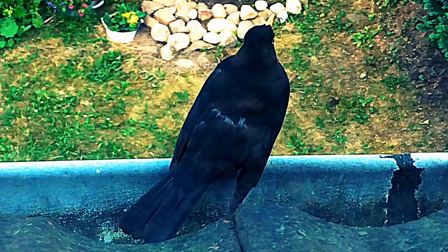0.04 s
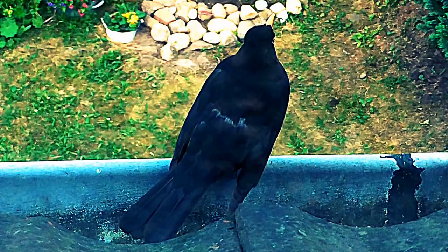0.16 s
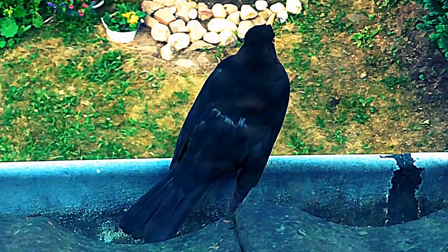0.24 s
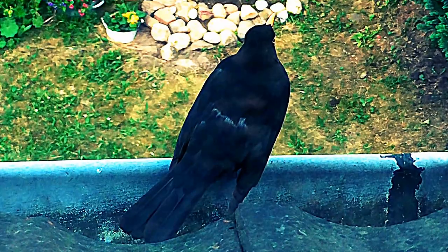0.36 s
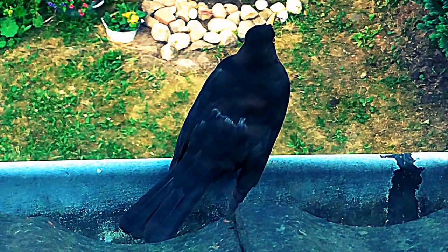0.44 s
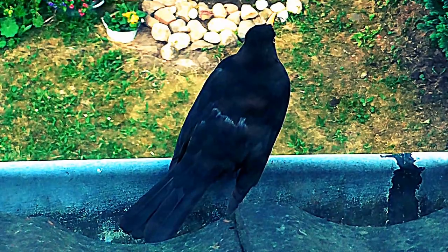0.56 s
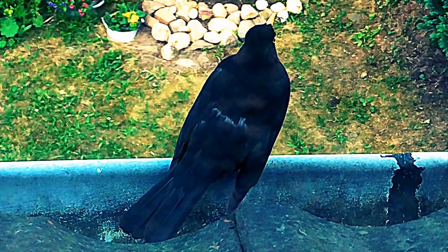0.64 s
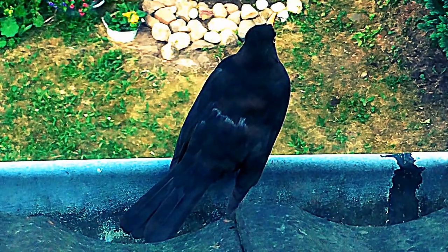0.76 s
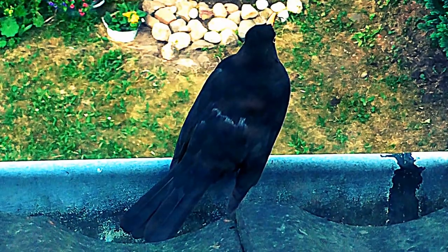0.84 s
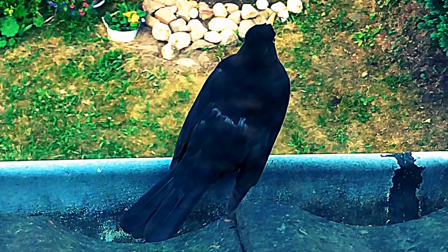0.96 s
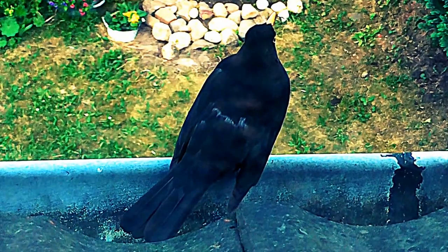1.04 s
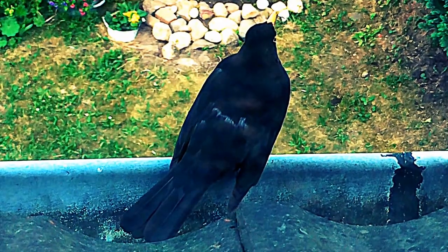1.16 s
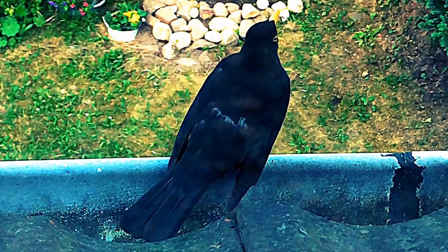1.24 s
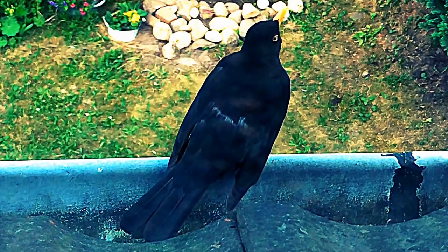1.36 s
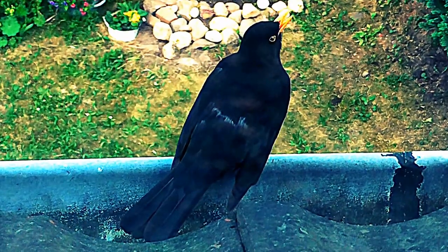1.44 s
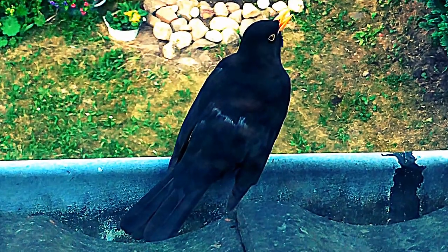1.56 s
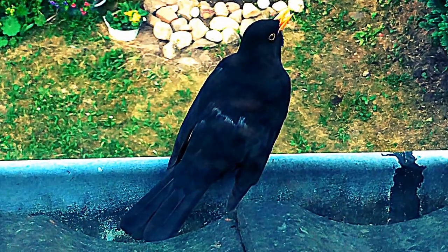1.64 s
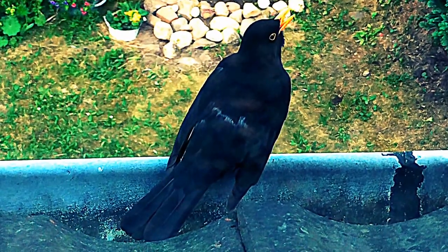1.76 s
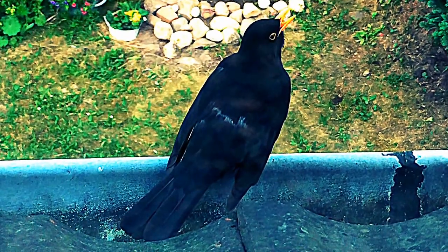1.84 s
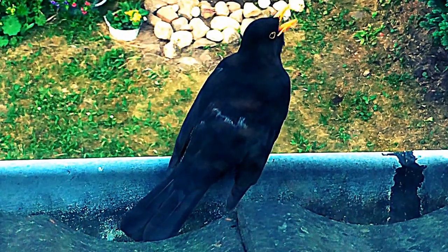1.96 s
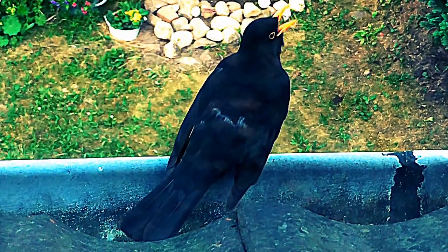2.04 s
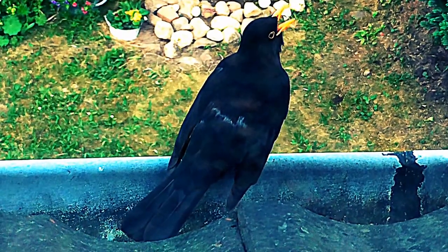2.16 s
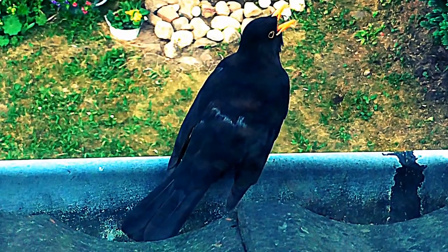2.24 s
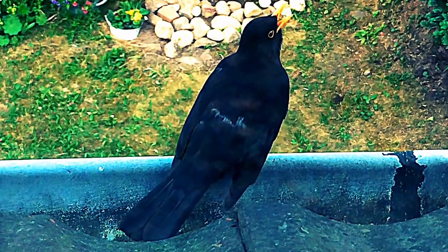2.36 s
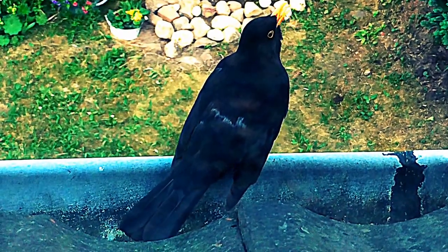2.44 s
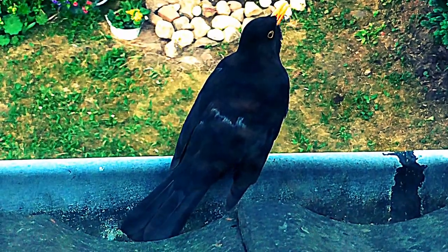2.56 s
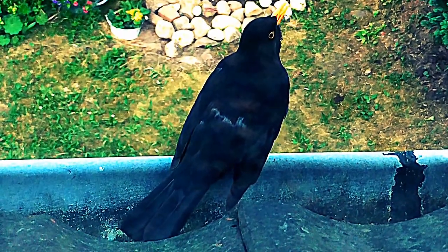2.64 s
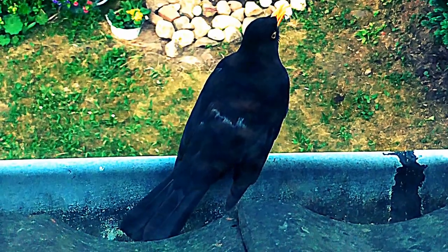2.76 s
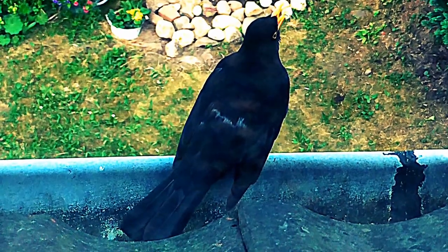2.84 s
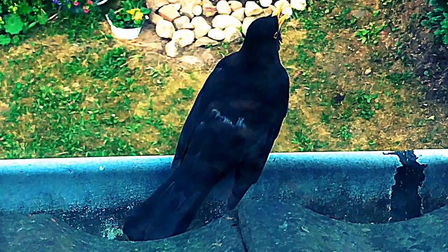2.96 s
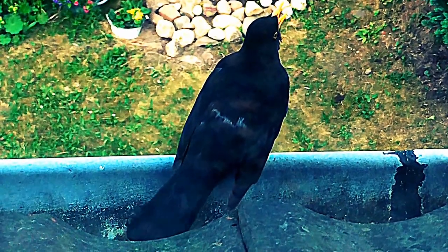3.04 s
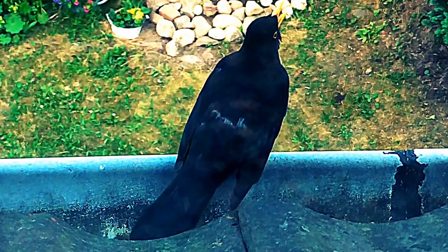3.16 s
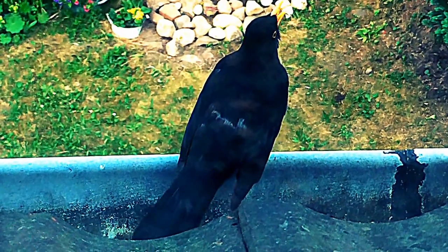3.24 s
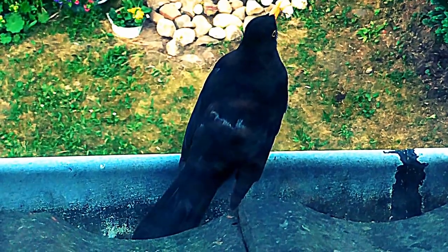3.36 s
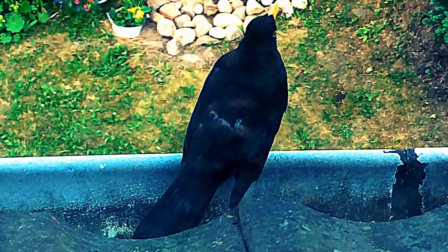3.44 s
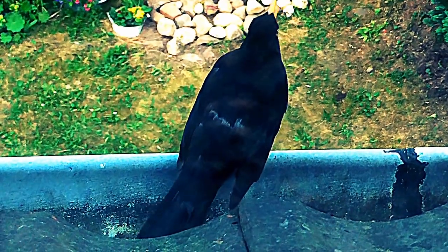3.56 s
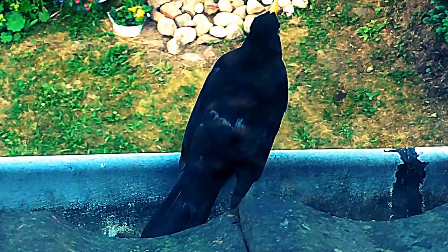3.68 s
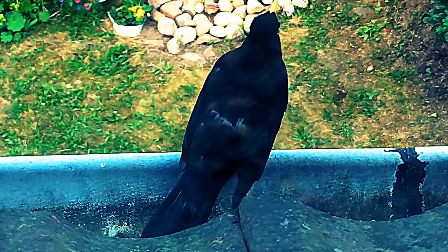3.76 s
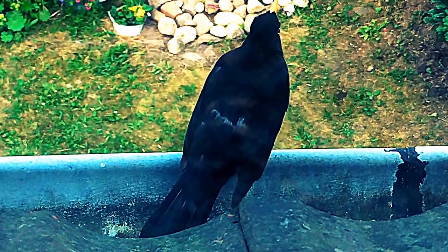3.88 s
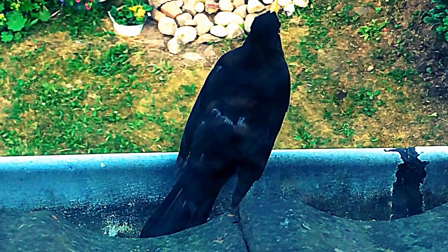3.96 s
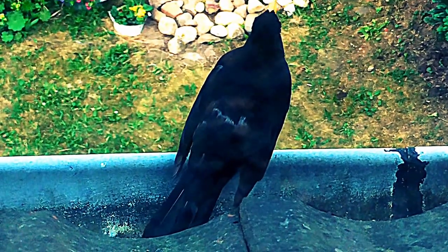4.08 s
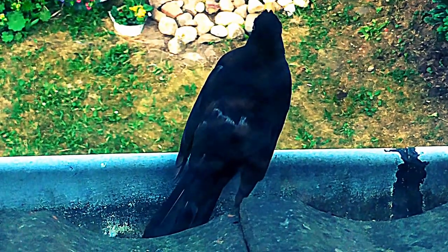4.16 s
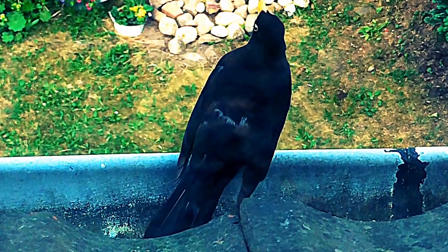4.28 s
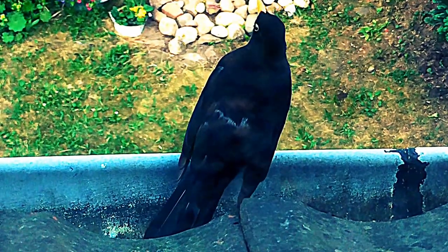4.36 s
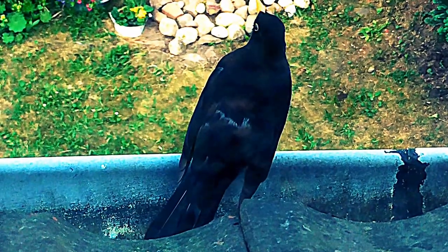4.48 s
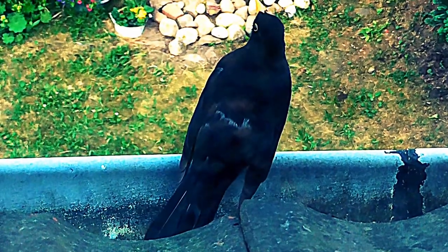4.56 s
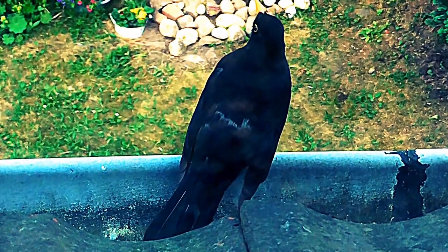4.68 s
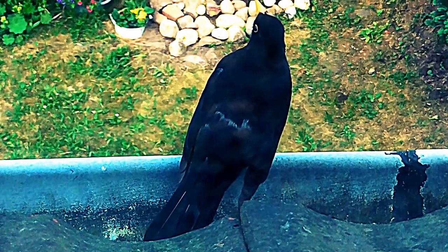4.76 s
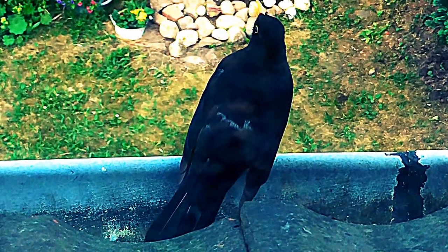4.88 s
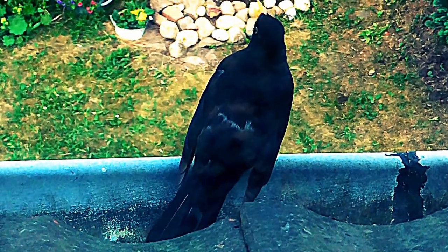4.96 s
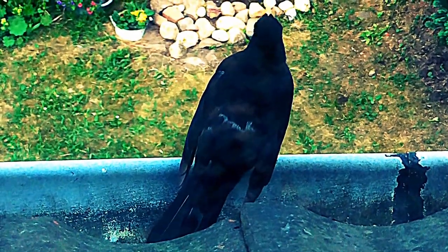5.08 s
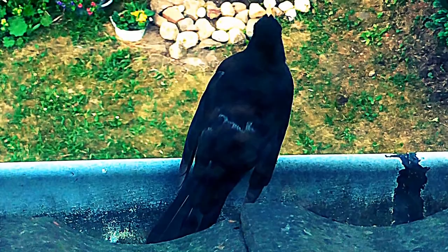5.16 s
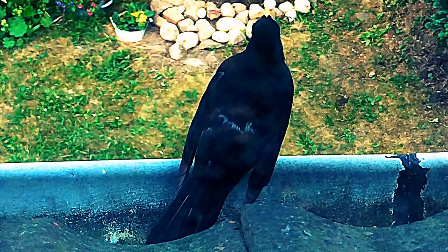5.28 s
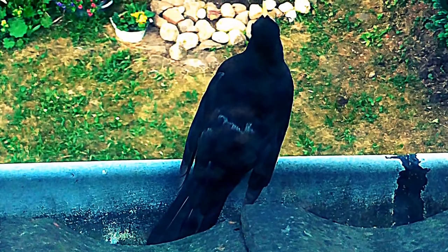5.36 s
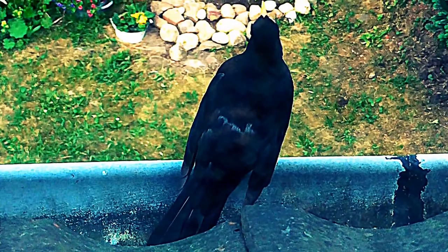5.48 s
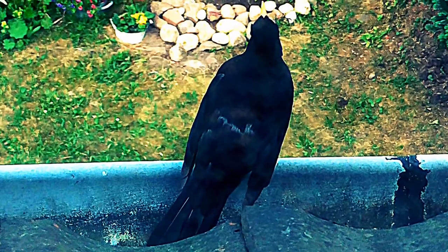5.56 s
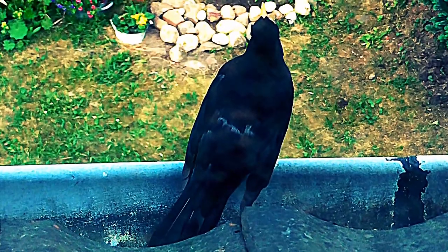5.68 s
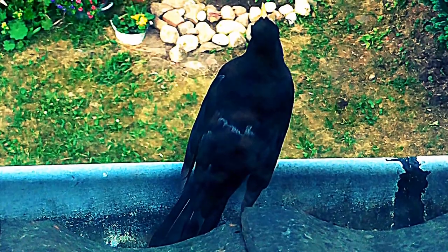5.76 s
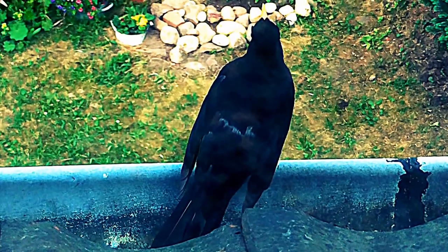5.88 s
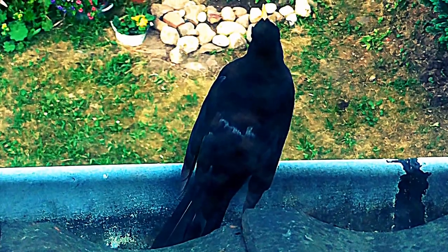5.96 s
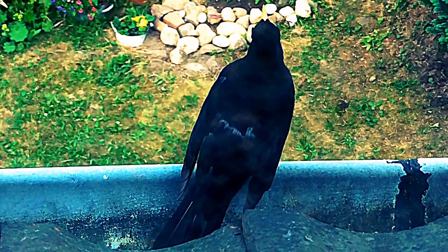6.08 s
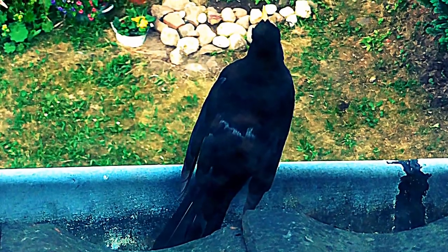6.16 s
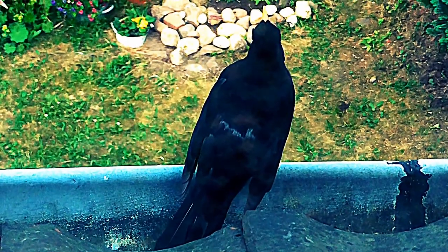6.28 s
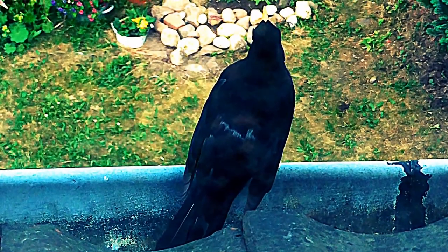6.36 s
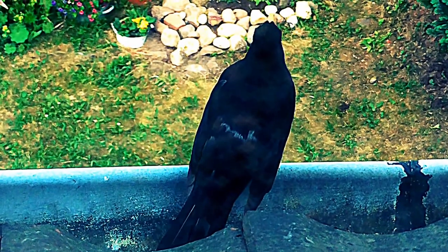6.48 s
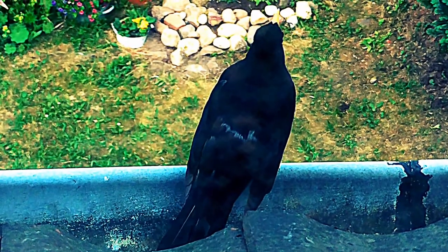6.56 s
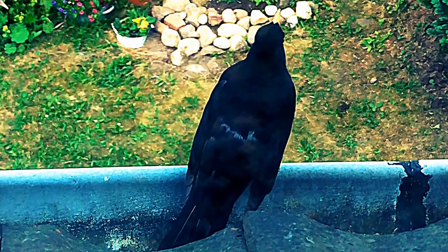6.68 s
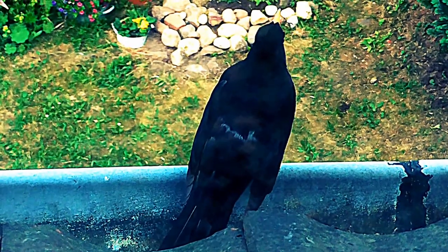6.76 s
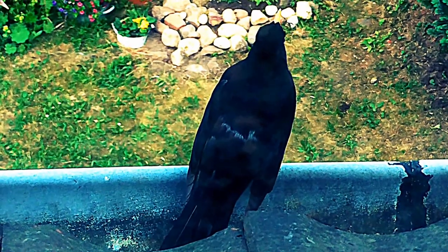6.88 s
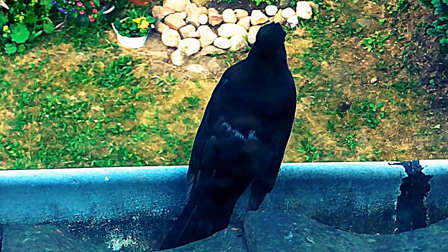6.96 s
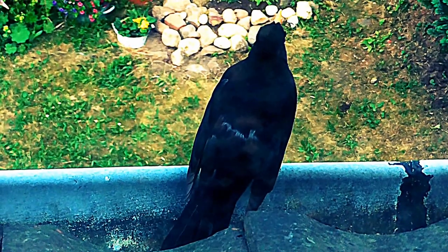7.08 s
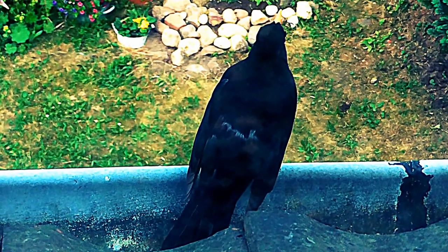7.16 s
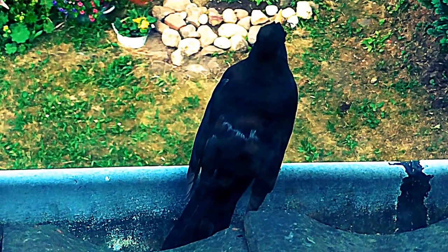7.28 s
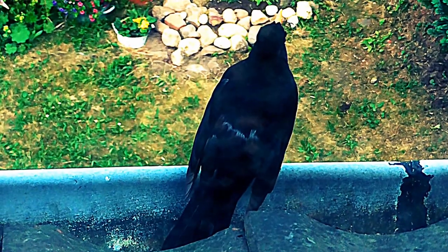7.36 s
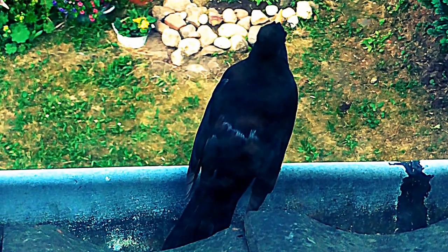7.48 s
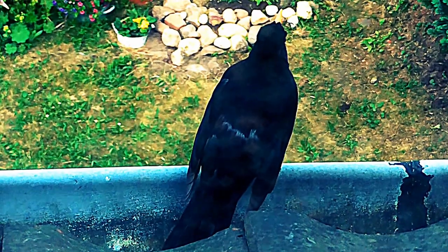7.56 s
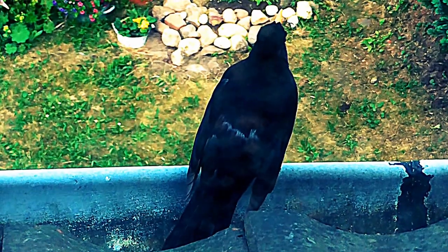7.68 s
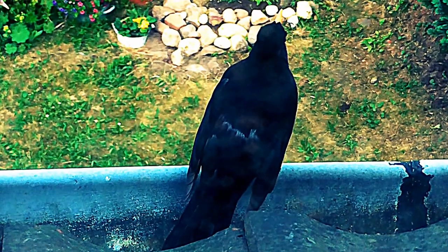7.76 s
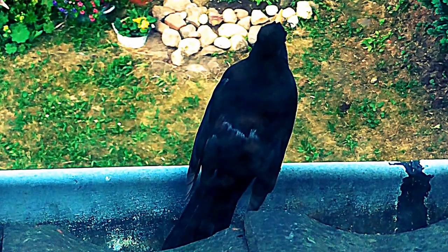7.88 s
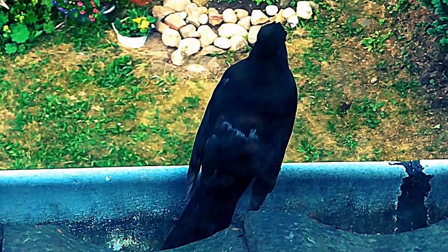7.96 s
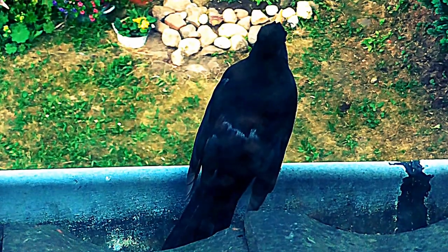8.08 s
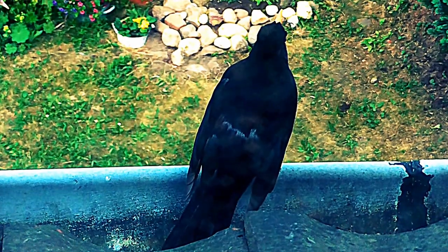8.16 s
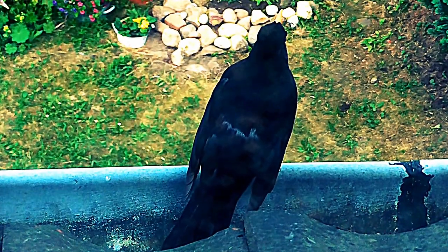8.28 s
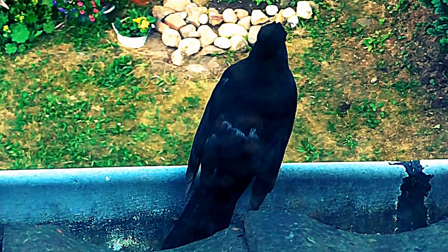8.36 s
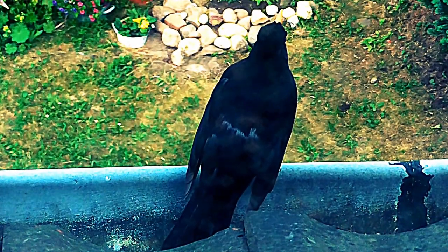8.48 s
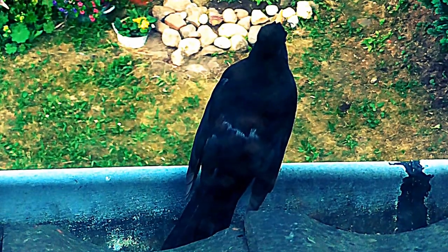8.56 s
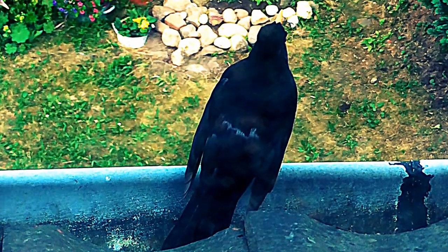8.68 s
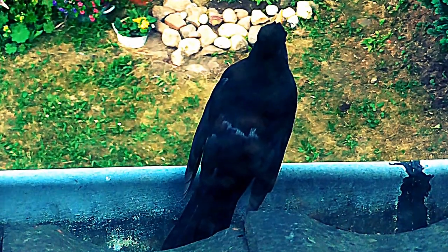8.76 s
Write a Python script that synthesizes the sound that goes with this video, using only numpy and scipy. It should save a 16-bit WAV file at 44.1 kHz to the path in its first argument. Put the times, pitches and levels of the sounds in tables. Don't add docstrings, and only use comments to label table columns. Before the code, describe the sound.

A blackbird perched on a roof gutter, facing away, sings slowed, mellow phrases: sliding whistles, a fluttering trill, gliding notes, a long held tone, then a high buzz, loud falling calls and low flute tones. Later it turns harsh, with rasping squeals and pips separated by gaps. Faint distant birds and low traffic hum lie beneath. The microphone is outdoors above a garden, where house fronts blur every note with dense reflections.

```python
import sys
import numpy as np
from scipy import signal
from scipy.fft import rfft, irfft
from scipy.io import wavfile
from scipy.ndimage import uniform_filter1d

SR = 44100
rng = np.random.default_rng(int(sys.argv[2]) if len(sys.argv) > 2 else 0)


def dump(signal):
    limited = np.clip(np.atleast_2d(signal).T, -1, 1)
    pcm = np.round(limited * 32767).astype(np.int16)
    wavfile.write(sys.argv[1], SR, pcm)


def amplitude_ratio(level_db):
    exponent = np.asarray(level_db, float) / 20
    return 10 ** exponent


N = 388962


def level(x, db):
    return x * amplitude_ratio(db) / np.sqrt(np.mean(x ** 2))


def on_log(table, hz):
    table = np.array(table)
    return np.interp(np.log(np.maximum(hz, 1)), np.log(table[:, 0]), table[:, 1])


def walk(rate):
    hold = int(SR / rate)
    held = np.repeat(rng.standard_normal(3000)[:N // hold + 1], hold)[:N]
    return 1.3 * uniform_filter1d(uniform_filter1d(held, hold), hold)


def band(hz, width):
    f = np.fft.rfftfreq(N, 1 / SR)
    bell = np.exp(-.5 * ((f - hz) / width) ** 2)
    return level(irfft(rfft(rng.standard_normal(N)) * bell, N), 0)


def bell_time():
    return np.arange(0, N / SR + .001, .001)


def swells(rows, steady_db):
    t = bell_time()
    power = amplitude_ratio(2 * steady_db)
    power = power + sum(amplitude_ratio(2 * db) * np.exp(-((t - s) / half) ** 2) for s, db, half in rows)
    return np.interp(np.arange(N) / SR, t, np.sqrt(power))


# f/Hz, level/dB per Hz
TOWN_SPECTRUM = [(25, -12.5), (45, -23), (90, -1.5), (160, -2), (260, -7), (360, -3.5), (800, -10.5),
                 (1100, -28), (1500, -32.5), (2300, -28), (4000, -38.5), (6400, -26), (8200, -46),
                 (9200, -49)]
# f/Hz, likeness/0-1
TOWN_LIKENESS = [(30, 1), (300, 0.79), (1000, 0.37), (4000, 0.31), (9000, 0.1)]
# f/Hz, left minus right/dB
TOWN_BALANCE = [(30, -4.5), (300, -3.5), (1500, -0.5), (6000, -0.5)]
# f/Hz, width/Hz, level/dB, swell/dB, swell rate/Hz
HUMS = [
    (150, 25, -63, 1.2, 3),
    (340, 5, -67, 2, 2),
    (390, 40, -64, 1, 2),
    (5500, 110, -86, 1.5, 3),
]


def town():
    town_db, calm_above_hz = -49.5, 1800
    out, swell, sign = 0, walk(0.25), np.array([[1], [-1]])
    for hz in 28 * 2 ** np.arange(0, 8.5, .5):
        like = np.clip(on_log(TOWN_LIKENESS, hz), 0, 1)
        shared = np.sqrt(1 + like) * band(hz, hz / 5)
        opposed = np.sqrt(1 - like) * sign * band(hz, hz / 5)
        flicker_db = 1.55 * walk(4.2) * min(1, calm_above_hz / hz)
        db = on_log(TOWN_SPECTRUM, hz) + 10 * np.log10(hz) + 0.18 * swell + flicker_db
        out = out + (shared + opposed) * amplitude_ratio(db + sign * on_log(TOWN_BALANCE, hz) / 2)
    out = level(out, town_db)
    for hz, width, db, swell_db, rate in HUMS:
        hum_db = db + swell_db * walk(rate) + sign * on_log(TOWN_BALANCE, hz) / 2
        out = out + band(hz, width) * amplitude_ratio(hum_db)
    return out


# f/Hz, width/Hz, level/dB
ENGINE_TONES = [
    (50, 2.2, -1.5),
    (70.3, 5.6, -0.5),
    (60, 22, 0),
]
# loudest t/s, level/dB, half length/s
VEHICLE_PASSES = [
    (1.35, -49.5, 0.12),
    (2.2, -55.5, 0.63),
    (3.5, -47, 0.19),
    (4.65, -47, .12),
    (5.12, -44.5, .12),
    (5.45, -49, .1),
    (6.28, -51, 0.091),
    (7.0, -51.5, 0.32),
    (7.74, -48.5, 0.065),
    (8.8, -50.5, 0.34),
]


def rumble():
    road_db = -55.5
    roar = sum(band(hz, width) * amplitude_ratio(share_db) for hz, width, share_db in ENGINE_TONES)
    roar = level(roar, 0.48) * swells(VEHICLE_PASSES, road_db)
    return roar * amplitude_ratio(np.array([[.5], [-.5]]) * TOWN_BALANCE[0][1])


# loudest t/s, level/dB, half length/s
FLOCK_BOUTS = [
    (.05, -64.5, 0.25),
    (1.15, -67, 0.27),
    (2.2, -65.5, 0.42),
    (4, -65.5, 0.65),
    (5.5, -66, 0.17),
    (6.5, -66.5, 0.23),
    (7.65, -61.5, 0.16),
    (8.6, -70, 0.24),
]


def chorus():
    flock_db = -76
    voices = [band(hz, 45) * amplitude_ratio(3.2 * walk(14)) for hz in (3130, 3220, 3310, 3400, 3500, 3270)]
    pair = np.array([sum(voices[:5]), sum(voices[1:])])
    return level(pair, -1.8) * swells(FLOCK_BOUTS, flock_db)


# t/s after the straight sound, level/dB
HOUSE_ECHOES = [(0, 2.5), (.01, 8), (.025, 3), (0.044, 4), (0.091, -3.5), (.14, -9), (.2, -19),
                (0.349, -31.5), (1.199, -61)]


def house_fronts():
    side_db, dull_hz = -7, 4950
    s, db = np.transpose(HOUSE_ECHOES)
    t = np.arange(int(1.2 * SR)) / SR
    hiss = rng.standard_normal((2, len(t)))
    dull = signal.lfilter(*signal.butter(1, dull_hz, fs=SR), hiss)
    age = np.clip(t / .5, 0, 1)
    mid, side = (hiss * (1 - age) + dull * age) * amplitude_ratio(np.interp(t, s, db))
    echo = np.array([mid + amplitude_ratio(side_db) * side, mid - amplitude_ratio(side_db) * side])
    return echo / np.sqrt(np.sum(echo ** 2) / 2)


# t/s, extra level/dB, half length/s
PATH_BEATS = [(1.462, 4, .015), (1.505, -6, .008), (1.92, -6, .005), (1.945, -6, .004), (1.958, 4, .008),
              (1.98, 3, .008), (2.005, 4.5, 0.0072), (2.626, -5, .007), (2.67, 2, .012), (2.727, -11, .014),
              (2.765, 3, .015), (2.825, 4, .012), (2.845, -5, .008), (3.18, 6, .004), (3.234, 4, .008),
              (3.283, -6, .005), (3.296, 5, .012), (3.352, -6, .004), (3.363, 6, .008), (3.428, -5, .005),
              (3.438, 4, .008), (3.497, -6, .005), (3.51, 3, .01), (4.27, 3, 0.0092), (5.982, -6, .004),
              (5.994, 4, .005), (6.048, -4, .005), (6.06, 5, 0.0055), (6.217, 4, .003), (6.23, -6, .01),
              (6.32, 4, .012), (6.345, -9, .005)]


def beats():
    t = bell_time()
    gain = amplitude_ratio(sum(db * np.exp(-((t - s) / half) ** 2) for s, db, half in PATH_BEATS))
    return np.interp(np.arange(N) / SR, t, gain)


# t/s, straight sound over echoes level/dB
STRAIGHT_OVER_ECHOES = [(.8, 1), (1.3, -5), (1.8, -7), (2.3, -5), (2.55, -6), (2.62, 1), (2.88, 1), (2.96, -6),
                        (3.3, -7.5), (3.8, -6), (4.15, -5.5), (4.4, -6), (5.1, -4), (5.5, 2), (5.9, -6.5), (6.5, -6.5),
                        (6.86, -6), (7.42, 6), (7.53, 4.5), (7.6, -5), (7.75, -0.5)]


def straight_strength():
    return amplitude_ratio(np.interp(np.arange(N) / SR, *np.transpose(STRAIGHT_OVER_ECHOES)))


def flutter(rasp, span):
    hoarse = .9
    return 1 - hoarse / 3 + hoarse * np.sqrt(2) * rasp[N - 1 - span]


# note f/Hz, overtone lift level/dB
WINDPIPE_LIFT = [(700, 6), (880, 2), (1000, -5.5), (2000, 1), (2280, -18), (2520, -4)]


def whistle(colour, rows, waver, rasp):
    clear_hz, edge_s = 2150, 0.0054
    s, hz, db, depth = np.transpose(rows)
    span = np.arange(int(s[0] * SR), min(int(s[-1] * SR), N))
    t = span / SR
    trill_hz = colour[4]
    trill = np.cos(2 * np.pi * trill_hz * (t - s[0])) + .25 * rasp[span]
    shake = trill if trill_hz > 1 else rasp[span]
    swing = np.interp(t, s, depth) * shake
    pitch = (np.interp(t, s, hz) + swing) * (1 + waver[span])
    phase = 2 * np.pi * np.cumsum(pitch) / SR
    over_db = [*colour[:4], colour[3] - 18, colour[3] - 7]
    over = 0
    for number, part_db in enumerate(over_db, 2):
        audible = number * pitch < .45 * SR
        blur = np.where(number * pitch > clear_hz, flutter(rasp, span), 1)
        over = over + amplitude_ratio(part_db) * np.sin(number * phase) * audible * blur
    tone = np.sin(phase) + amplitude_ratio(on_log(WINDPIPE_LIFT, pitch)) * over
    to_edge = np.minimum(t - s[0], s[-1] - t)
    edge = np.sin(np.pi / 2 * np.clip(to_edge / edge_s, 0, 1)) ** 2
    return span, np.sqrt(2) * tone * edge * amplitude_ratio(np.interp(t, s, db))


def sing(voice, notes):
    colour, shape = voice
    sung = []
    for s, length, from_hz, to_hz, db in notes:
        rows = [(s + at * length, from_hz + glide * (to_hz - from_hz), db + under_db, depth)
                for at, glide, under_db, depth in shape]
        sung.append((colour, rows))
    return sung


# t/s, length/s, start f/Hz, end f/Hz, level/dB.
CHIRP_VOICE = (-24, -41, -44, -50, 0, -3.5), [(0, 0.0071, -3.5, 30), (.4, .12, 0, 40), (.65, .45, -4.5, 40),
               (1, 1, -6, 40)]
CHIRP_NOTES = [
    (.168, .026, 2600, 2000, -57.5),
    (.2, 0.044, 2380, 1830, -57.5),
    (.438, 0.027, 2600, 1950, -57),
    (.47, .045, 2380, 1904, -56),
    (.748, 0.036, 2135, 1830, -58.5),
]
PEEP_VOICE = (-29.5, -33, -51, -51, 0, 0.5), [(0, 0.0088, -2.5, 25), (.5, .7, 0.2, 25.1), (1, 1, -1.5, 25)]
PEEP_NOTES = [(.32, .035, 1610, 1620, -71), (.59, .06, 1587, 1584, -75), (3.99, 0.24, 1108, 1081, -61),
              (6.069, 0.13, 5020, 4860, -65.5), (6.74, .06, 5250, 5200, -63), (6.37, .06, 5270, 5320, -66),
              (6.32, .09, 7000, 7050, -68), (8.46, 0.12, 3700, 3980, -57), (8.57, .11, 3970, 3800, -59.5),
              (8.75, 0.049, 4600, 4410, -63), (8.78, 0.032, 3660, 3650, -53)]


def chirps_and_peeps():
    return sing(CHIRP_VOICE, CHIRP_NOTES) + sing(PEEP_VOICE, PEEP_NOTES)


WISP_VOICE = (-40, -50, -60, -60, 0, -0.5), [(0, 0, -2, 201), (.3, .4, 0, 260), (1, 1, -5, 260)]
WISP_NOTES = [(5.26, .13, 5600, 5330, -65), (7.553, .06, 5900, 5700, -62), (6.868, .1, 5700, 5550, -57),
              (6.7, 0.09, 5300, 5150, -59), (4.143, .04, 5900, 5500, -60), (7.505, 0.077, 3950, 4100, -57),
              (3.08, .1, 2050, 2900, -58.5), (3.06, .14, 4600, 3600, -60.5), (6.87, 0.082, 4400, 4900, -64),
              (3.79, .08, 5750, 5600, -57), (6.03, .17, 7200, 7000, -63), (5.55, .15, 6900, 6500, -66),
              (4.3, .1, 5600, 5000, -65), (4.35, 0.091, 4150, 3500, -55.5), (4.19, .035, 6100, 5600, -59),
              (4.26, .09, 4000, 4500, -58.5), (6.86, 0.092, 3100, 2900, -53), (6.74, .09, 3250, 3350, -50),
              (7.49, .06, 3050, 3150, -47.5), (5.22, .1, 2600, 2500, -64)]


def rough_wisps():
    return sing(WISP_VOICE, WISP_NOTES)


NASAL_VOICE = (-5, -7.5, -20.5, -24, 0, -0.5), [(0, 0, -2.5, 25), (.3, .6, -.1, 13), (1, 1, -10, 25)]
NASAL_NOTES = [
    (6.85, 0.075, 1080, 1200, -55.5),
    (6.81, 0.054, 1530, 1400, -62),
    (8.57, .15, 1030, 1110, -59.5),
]
RASP_VOICE = (-23, -34, -47, -45.5, 0, 0), [(0, 0, -0.5, 170.4), (.33, 1.9, -3.5, 260), (1, 1, -9.5, 330)]
RASP_NOTES = [
    (6.715, .115, 2450, 2960, -48),
    (7.553, .075, 3050, 3250, -41),
    (4.335, .065, 1750, 1900, -36.5),
    (7.563, 0.091, 3500, 3650, -45),
    (6.856, 0.11, 3700, 4000, -52.5),
    (4.245, .12, 3200, 3500, -53),
]
# a colour, then t/s, f/Hz, level/dB, rasp depth f/Hz
SQUEAL_NOTES = [
    ((-33, -47, -28, -45, 0, -1.5), [(6.657, 1995, -48, 120), (6.68, 2900, -45.5, 150.4), (6.705, 3800, -45, 119), (6.725, 4120, -47, 80), (6.83, 4080, -53, 90)]),
    ((-23, -27, -50, -37, 0, -1.5), [(6.672, 1952, -40, 110), (6.69, 2175, -33.5, 60), (6.715, 1954, -38.5, 60), (6.79, 1927, -45, 50)]),
    ((-24, -31.5, -36.5, -32, 0, -.5), [(6.849, 903, -51, 110), (6.856, 1806, -41, 100), (6.863, 2374, -32.5, 60), (6.9, 2277, -40.5, 130), (6.94, 2470, -43.5, 20), (6.99, 2430, -58, 18)]),
    ((-6, -36, -50, -44, 0, 1), [(7.48, 2520, -45, 15), (7.52, 2580, -47, 40), (7.532, 2580, -55, 60), (7.545, 2580, -47.5, 58), (7.59, 2620, -53, 90), (7.62, 2660, -60, 110)]),
    ((-30, -23, -41, -44, 0, 0), [(7.535, 2008, -55, 60), (7.64, 2010, -59, 40), (7.665, 1750, -53.5, 60), (7.71, 1180, -56, 60), (7.718, 1120, -66, 60)]),
    ((-25, -21, -40, -44, 0, .1), [(7.724, 1110, -50, 60), (7.76, 1050, -56, 150), (7.83, 1061, -50.5, 170), (7.9, 1040, -54.5, 171), (7.94, 1034, -53, 90)]),
    ((-17, -33, -43, -48.5, 0, -2), [(4.112, 2900, -60, 60), (4.125, 3006, -50, 70), (4.144, 3010, -43, 60), (4.149, 2344, -35, 60), (4.157, 1720, -43, 90)]),
    ((-21, -37, -45, -50, 0, 1), [(4.15, 3050, -44, 80), (4.2, 3030, -47, 90), (4.22, 3000, -60, 120), (4.25, 3000, -53, 130), (4.3, 2980, -53, 130), (4.31, 2980, -58, 130)]),
]


def harsh_notes():
    return SQUEAL_NOTES + sing(NASAL_VOICE, NASAL_NOTES) + sing(RASP_VOICE, RASP_NOTES)


PIP_VOICE = (-20, -34.5, -53, -45, 0, -0.5), [(0, 0.01, -4, 15), (.4, .3, -0.5, 25), (.75, .7, -1.5, 25),
             (1, 1, -10, 15)]
PIP_NOTES = [
    (7.424, 0.019, 2000, 1960, -50),
    (7.462, .022, 2000, 1980, -44),
    (7.503, 0.026, 2000, 2040, -41),
    (7.441, .04, 2840, 3080, -46.5),
]
DROP_VOICE = (-16, -32, -43.5, -48.5, 0, -.7), [(0, .3, -5, 90), (.17, 0.04, -2, 25), (.78, 0.004, 0, 15),
              (.85, .55, 0, 60), (1, 1, -8.5, 98)]
DROP_NOTES = [
    (4.168, .087, 2570, 1342, -35),
    (4.258, .082, 2271, 1603, -27),
]


def short_calls():
    return sing(PIP_VOICE, PIP_NOTES) + sing(DROP_VOICE, DROP_NOTES)


# a colour, then t/s, f/Hz, level/dB, trill depth f/Hz
TRILL_NOTES = [
    ((-33, -34, -47, -39, 20, 1), [(1.668, 1090, -46, 170), (1.75, 1030, -39, 235), (1.86, 1020, -35, 215), (1.9, 1000, -33, 110), (1.925, 1025, -29, 25), (1.95, 1055, -26, 10), (2.0, 1078, -26, 0.5), (2.04, 1082, -39, 5.5), (2.1, 1075, -40.5, 20)]),
    ((-31.5, -25.5, -39.5, -37.5, 14.5, .5), [(3.1, 1198, -32.5, 160), (3.2, 1181, -33.5, 109.8), (3.3, 1170, -32, 69.8), (3.42, 1160, -35, 45), (3.52, 1169, -44.5, 30)]),
    ((-11.5, -43, -55, -43, 43.5, .5), [(3.65, 2924, -57, 122.5), (3.67, 3134, -40, 149.8), (3.78, 3228, -36.5, 124), (3.8, 3060, -43, 230), (3.87, 3080, -54, 230)]),
    ((-30.5, -28.5, -55, -34.5, 30, 0.5), [(5.958, 1073, -33, 43.3), (6.05, 1112, -35.5, 110.7), (6.14, 1110, -33, 129.5), (6.215, 957, -36.5, 80)]),
]


def trills():
    return TRILL_NOTES


SWELL_VOICE = (-20, -27, -28, -46, 0, 0), [(0, 0, -14, 0), (.5, .1, -5.5, 0), (1, 1, 1.2, 0)]
SWELL_NOTES = [
    (5.915, .035, 882, 850, -42),
    (6.29, .12, 1723, 1774, -44.5),
]
HELD_VOICE = (-37, -33.5, -47.5, -27.5, 0, -2), [(0, 0.0064, -1, 6), (.2, .45, -0.5, 4), (.52, .75, 0, 4.3),
              (.75, .9, -4, 4), (1, 0.97, -13.5, 4)]
HELD_NOTES = [
    (2.575, .355, 1017, 937.3, -31),
    (6.215, 0.17, 957.7, 944.8, -34),
]
FADING_VOICE = (-32.5, -27, -41, -34.5, 0, -0.3), [(0, 0.032, -3.5, 0.5), (.15, .1, -0.4, 0.5),
                (.45, .6, -8, 8), (1, 1, -17.5, 30.5)]
FADING_NOTES = [
    (1.417, .163, 1031, 935, -31),
    (6.416, 0.14, 1352, 1296, -35),
]
WARBLE_VOICE = (-31, -20.5, -44, -49, 0, 0.2), [(0, 0.013, -8, 0.0024), (.42, 1, 0, 0), (.75, .97, -0.5, 0),
                (1, 0.021, -6.5, 0.0019)]
WARBLE_NOTES = [
    (2.215, 0.13, 1253, 1351, -30.5),
    (2.34, 0.1293, 1245, 1337, -33.5),
    (2.47, 0.066, 1242, 1270, -39.5),
]
# a colour as in whistle(), then t/s,
# f/Hz, level/dB, rasp depth f/Hz
SINGLE_NOTES = [
    ((-16.5, -40, -52, -50, 0, 0.5), [(6.866, 3230, -44.5, 130), (6.9, 3223, -43.5, 110), (6.94, 3280, -42, 90), (6.975, 3280, -54, 90)]),
    ((-27, -42, -48, -45, -0.5, 0), [(1.345, 706, -41.5, -0.5), (1.385, 769, -42.5, 2.5), (1.4, 891, -43, 9), (1.419, 1017, -35, 0)]),
    ((-24, -24.5, -37.5, -39.5, 0, 1), [(2.966, 1091, -46.5, -0.5), (2.98, 1152, -33, 0), (3.02, 1187, -30.5, 0), (3.045, 1359, -37.5, 8), (3.07, 1449, -32, 8), (3.082, 1398, -35, 8.5), (3.094, 961, -36.5, 9), (3.11, 950, -40, 9)]),
                ((-30, -22.5, -41.5, -49, 0, -0.5), [(2.097, 1310, -36, 0.0039), (2.17, 1340, -31.5, 0.0014), (2.215, 1254, -42.5, 0)]),
    ((-16, -11, -23, -22, 0, -2.5), [(5.068, 642, -53.5, 64), (5.1, 648, -55, 30), (5.112, 653, -46, 3.4), (5.17, 644.6, -50, 3.5), (5.2, 630, -55, 5.5)]),
    ((1, -10.5, -10, -15.5, 0, .5), [(5.213, 1018, -46, 10), (5.233, 880, -51.5, 15), (5.255, 819.5, -50, 10), (5.29, 778, -50, 10)]),
    ((-18, -33.5, -29, -36, 0, -1.5), [(5.28, 785, -47.5, 15), (5.35, 751, -41.5, 10), (5.42, 753.4, -45, 5), (5.47, 748, -40.5, 4), (5.52, 736.6, -40, 4), (5.54, 712, -42.5, 5.4)]),
    ((-33, -37, -47, -32.5, 2, -2.5), [(5.535, 715, -41, 0), (5.57, 645, -46.5, -0.3), (5.6, 634, -49, 8), (5.68, 625, -45.5, 7.5), (5.72, 599.5, -44.5, 5), (5.75, 598, -56, 5)]),
    ((-25, -31, -34, -29, 0, 0), [(5.5, 1235, -62, 30), (5.55, 1174, -52.5, 70), (5.64, 1140, -54, 60), (5.71, 1111, -49.5, 22), (5.79, 1103, -53.5, 27), (5.87, 1085, -61.5, 35)]),
]


def flute_notes():
    smooth = sing(SWELL_VOICE, SWELL_NOTES) + sing(HELD_VOICE, HELD_NOTES)
    gliding = sing(FADING_VOICE, FADING_NOTES) + sing(WARBLE_VOICE, WARBLE_NOTES)
    return SINGLE_NOTES + smooth + gliding


def birds():
    cross_db, lock_hz, rasp_rate = -13.5, 160, 220
    notes = chirps_and_peeps() + rough_wisps() + harsh_notes() + short_calls() + trills() + flute_notes()
    waver, rasp = .003 * walk(40), np.tanh(walk(rasp_rate))
    out, sung = np.zeros((2, N)), np.zeros(N)
    for colour, rows in notes:
        span, note = whistle(colour, rows, waver, rasp)
        power = uniform_filter1d(sung[span] ** 2 + note ** 2, size=200)
        both = np.sqrt(np.abs(power) + 1e-12)
        steady = np.mean(np.transpose(rows)[3]) < lock_hz
        cross = steady * amplitude_ratio(cross_db) * sung[span] * note / both * flutter(rasp, span)
        sung[span] += steady * note
        out[:, span] += (note + cross) * amplitude_ratio(np.array([[.5], [-.5]]) * colour[5])
    return out


def scene():
    song_db, shadow_hz = .7, 2600
    garden = house_fronts()
    straight = straight_strength()
    song = birds() * amplitude_ratio(song_db) / np.sqrt(1 + straight ** 2)
    shaded = signal.lfilter(*signal.butter(2, shadow_hz, fs=SR), song)
    echoed = signal.fftconvolve(song, garden, axes=1)[:, :N]
    heard = shaded * straight + echoed
    return heard * beats() + town() + rumble() + chorus()


def low_pass(x):
    return signal.sosfilt(signal.butter(12, 8990, fs=SR, output="sos"), x)


def record(dry):
    top_hz = 8820
    slowed = signal.sosfilt(signal.ellip(8, .2, 60, top_hz, fs=SR, output="sos"), dry)
    return low_pass(slowed)


dry = scene()
out = record(dry)
dump(out)
```